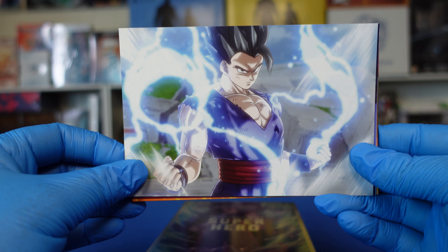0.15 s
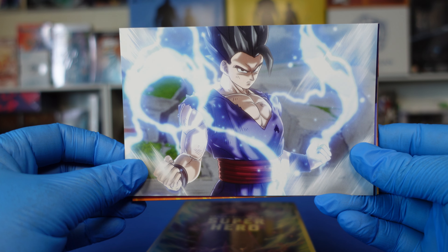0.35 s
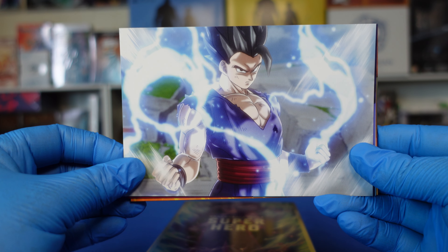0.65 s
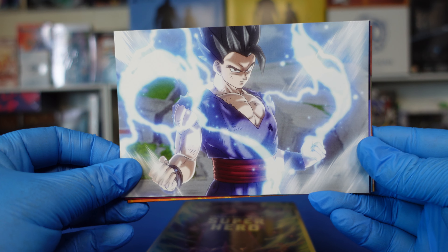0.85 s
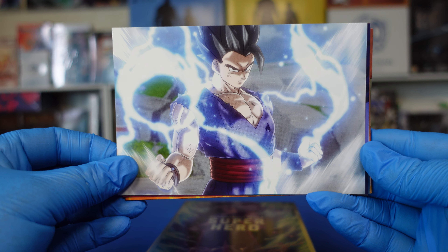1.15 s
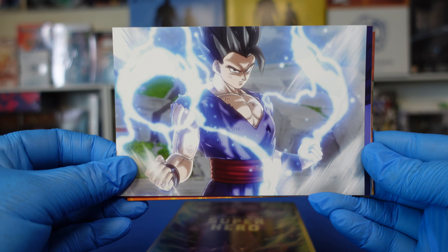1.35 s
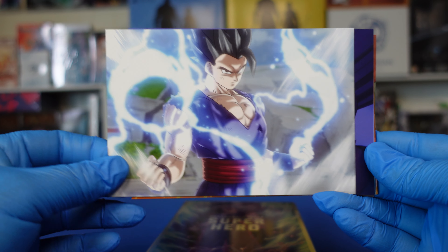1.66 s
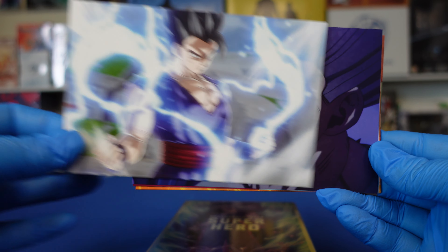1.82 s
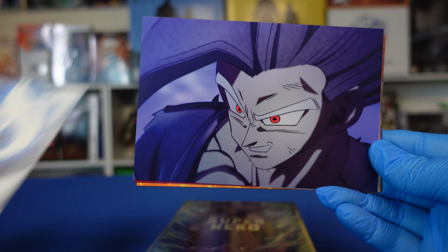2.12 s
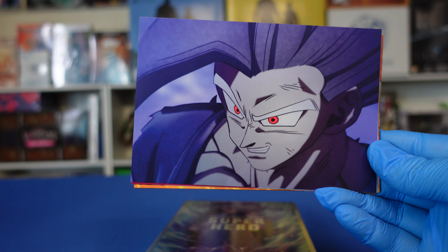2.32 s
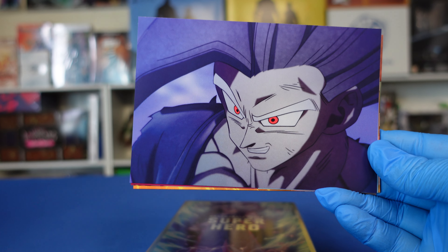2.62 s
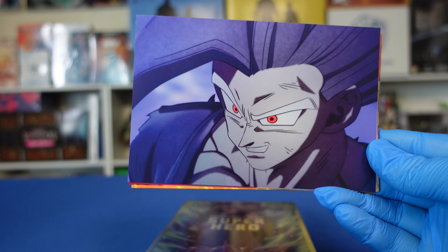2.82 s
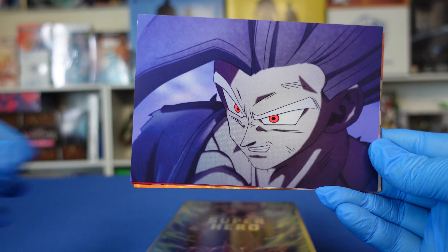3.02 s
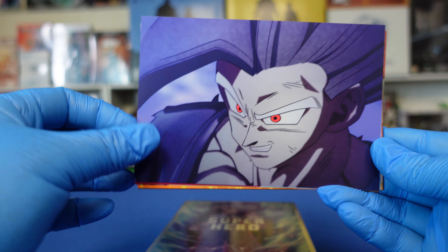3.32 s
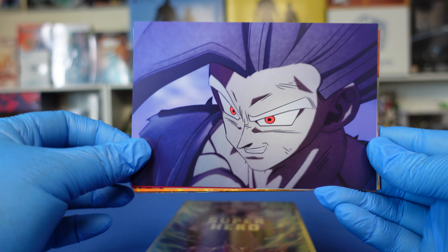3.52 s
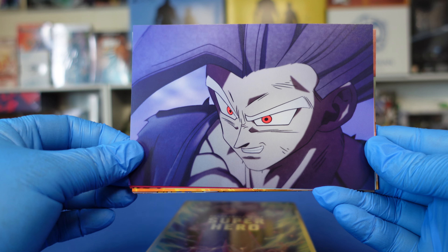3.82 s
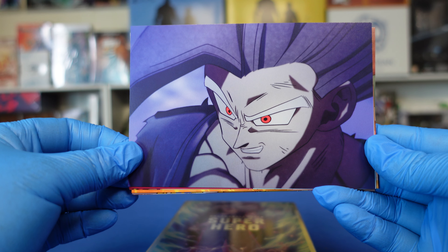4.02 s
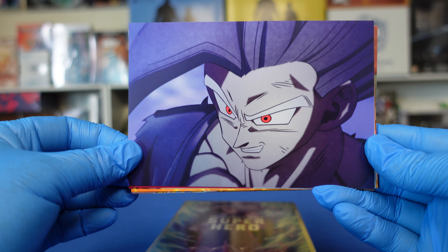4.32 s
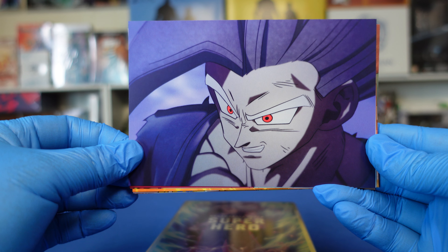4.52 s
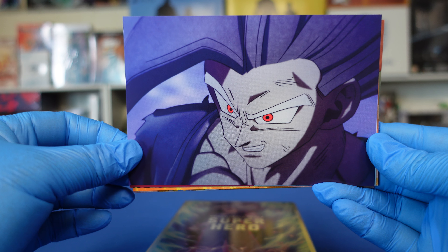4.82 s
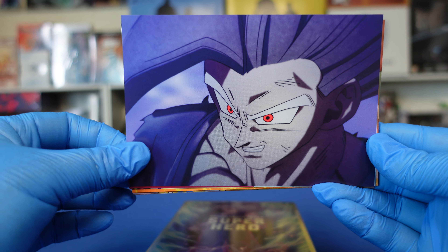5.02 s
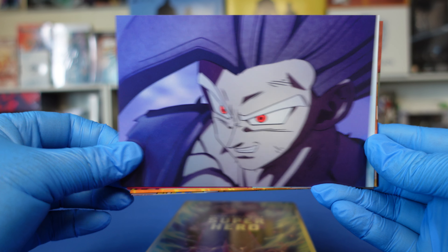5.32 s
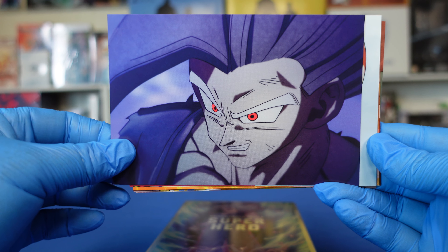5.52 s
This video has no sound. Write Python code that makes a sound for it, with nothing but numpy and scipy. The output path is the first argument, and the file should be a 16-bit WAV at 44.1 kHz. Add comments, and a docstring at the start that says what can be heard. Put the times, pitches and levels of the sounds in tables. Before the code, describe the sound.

Gloved hands slide a stiff card off a stack with a soft hiss and faint squeaks, then snap it in behind.

```python
"""A soft rustle and hiss come first, as gloved hands slide the front card off a stiff stack, close by in
a quiet room. Sliding friction makes the cards hiss, stick-slip motion makes them squeak, and impacts
make their edges tick. The card flexes with dull flaps, is tucked in behind and snaps home against the
stack. After a pause of small finger movements the next card starts to slide."""
import sys
import numpy as np
from scipy import signal
from scipy.fft import rfft, irfft, next_fast_len
from scipy.io import wavfile
from scipy.ndimage import uniform_filter1d

SR = 44100
rng = np.random.default_rng(int(sys.argv[2]) if len(sys.argv) > 2 else 0)


def to_wav(s):
    """Save 16-bit WAV."""
    ch = np.atleast_2d(s).T  # columns
    pcm = np.round(np.clip(ch, -1, 1) * 32767)  # PCM
    wavfile.write(sys.argv[1], SR, pcm.astype(np.int16))


N = 249606
TIME = np.arange(N) / SR

# Spectra of the rubbing cards, one for each grip. Each row: frequency in Hz, relative level in dB.
LOOSENED_SPECTRUM = [(710, -35), (1200, -8.5), (1980, -4), (2530, -2.5), (2830, -1), (4130, -4),
                     (5020, -16), (5650, -3), (6510, -4.5), (10300, -13), (12900, -14), (14700, -8),
                     (16000, -16)]
HELD_SPECTRUM = [(900, -28), (1600, -2), (2800, 12), (3700, 6), (4800, 5), (5900, 9), (7200, 4),
                 (8400, 0.5), (10500, -6), (12300, -4), (13700, 0.5), (16000, -6.5)]
DRAWN_SPECTRUM = [(530, -63), (900, -33), (1120, -22), (1340, -13), (1440, -17), (1830, -2), (2450, -25),
                  (2830, -3), (3470, 4), (4360, -13), (4980, -2.5), (5680, -1.5), (8550, -12), (15100, -10),
                  (16000, -11.5)]
LIFTED_SPECTRUM = [(710, 0), (1200, -12), (1700, -6), (2510, -6), (2650, -2.5), (3080, 0), (4750, -10),
                   (5710, -1.5), (8000, -7.5), (8820, -5), (12200, -9), (15200, -4), (16000, -15)]
FREE_SPECTRUM = [(590, -42), (1000, -16), (1310, -7), (1690, 1), (2130, 1.5), (3750, -8), (5250, 1.5),
                 (6250, -5), (8650, -9.5), (11600, -0.5), (13900, -1), (15500, -2), (16000, -9)]
TUCKED_SPECTRUM = [(350, -38), (600, -10), (997, -6), (1430, -12.5), (1640, 2.5), (1980, -5), (2720, 0.5),
                   (3430, -7.5), (4460, -2), (4980, -7), (5790, 0.5), (8860, -13.5), (9760, -8.5),
                   (14100, -10), (16000, -11)]
SEATED_SPECTRUM = [(470, -58), (800, -26), (1660, -3), (1920, -16), (2700, 2.5), (3650, -8.5), (5940, -2),
                   (7450, -19), (12800, -12), (16000, -24)]
SETTLED_SPECTRUM = [(290, -40), (500, -7), (1600, -6), (2430, -9), (2770, 0), (4800, -6), (7210, -2),
                    (9220, -14), (11000, -12), (14700, -11), (16000, -15)]
NEXT_SPECTRUM = [(470, -52), (800, -20), (942, -19), (1240, -10), (1440, -9), (1920, 3), (2470, -8),
                 (2660, 5), (3140, -5.5), (3650, 0.5), (4460, -7.5), (5580, 1), (6650, -8.5), (12900, -11),
                 (16000, -16)]
# Strokes of the hand. Each row: start and push time in seconds, swell in dB, relative scrape and hiss
# levels at the end of the push in dB, release T60 in seconds, grip.
STROKES = [ (.455, 0.032, 8, -64, -54.5, 1.1, "held"), (0.714, 0.14, 2.5, -44, -51.5, 0.11, "loosened"),
           (.86, .025, 4, -52, -54, 1, "loosened"), (1.0, 0.1, 7, -54.5, -51.5, 0.52, "held"),
           (1.185, .022, 7, -57.5, -50.5, 0.28, "held"), (1.255, 0.17, 4, -54.5, -49, 0.38, "held"),
           (1.435, 0.11, 12.5, -40.5, -39.5, 0.46, "drawn"), (1.545, 0.094, 3, -35, -43, 0.19, "drawn"),
           (1.665, 0.22, 4, -43, -51, .12, "lifted"), (1.87, .025, 0, -51.5, -60, .9, "lifted"),
           (1.96, 0.12, 10, -51, -53, .2, "free"), (2.1, 0.064, 3, -51, -45, 0.51, "free"),
           (2.15, 0.079, 13, -42.5, -42.5, 0.11, "free"), (2.28, 0.082, 21, -46.5, -63, 0.32, "free"),
           (2.432, 0.06, 19.5, -37, -37, .12, "tucked"), (2.499, 0.056, 10.5, -30.5, -32, 0.023, "tucked"),
           (2.556, .012, -2, -38.5, -48, 0.24, "tucked"), (2.59, 0.032, -3, -30.5, -38.5, 0.023, "seated"),
           (2.624, 0.0099, 4.5, -31.5, -31.5, 0.088, "settled"), (2.66, .02, 0, -55.5, -60, 1.2, "settled"),
           (3.395, 0.047, 16, -50.5, -57, .08, "held"), (3.493, .008, 0, -55, -54.5, 0.41, "held"),
           (3.59, .033, -1, -60.5, -60, 0.66, "held"), (3.72, .1, 7, -60.5, -66, 1.4, "held"),
           (4.6, 0.1, 14.5, -52, -48.5, 0.71, "held"), (4.868, .014, 9, -58, -51.5, 0.091, "held"),
           (5.3, .05, 7, -61, -58, .05, "next"), (5.362, 0.025, 2, -46, -48, 0.061, "next"),
           (5.4, .006, 1, -42, -43.5, 0.23, "next"), (5.452, 0.11, 3, -39.5, -46.5, .08, "next"),
           (5.575, .02, -2, -49, -52, 0.39, "next")]
# Damped modes of a card held in the fingers. Each row: frequency in Hz, bandwidth in Hz, gain in dB.
CARD_MODES = [(1710, 200, 3), (2845, 140, 9), (3230, 890, 1.5), (5900, 250, 9), (7960, 1200, -2),
              (9300, 1200, -4), (10600, 8400, -10), (14900, 2200, 1.5)]
# Stick-slip glides. Each row: start, time to the turn and time after it in seconds, slips per second at
# the start, turn and end, relative level in dB, swell in dB, jitter from 0 to 1, direct sound in dB.
SQUEAKS = [ (1.494, 0.069, 0.017, 3500, 3300, 2000, -40, 3, .17, -22),
           (1.576, .036, .042, 2280, 1700, 980, -38, 6, .17, -8),
           (1.597, 0.015, .034, 2800, 4000, 1620, -37, -9, .18, 0),
           (5.401, .011, 0.014, 4600, 1950, 1720, -42, 1, .1, -8),
           (5.483, .025, .011, 1570, 2000, 2700, -42.5, -3, .15, -9),
           (5.519, .013, .038, 2550, 2750, 1100, -39, -6, 0.14, -7)]
# Edge ticks and snaps. Each row: start in seconds, relative level in dB, emphasised frequency in Hz,
# T60 in seconds, left over right in dB.
EDGE_TICKS = [(.848, -35.5, 4400, 0.027, 0), (1.3548, -31.5, 2700, 0.0079, 0),
              (1.457, -35, 3480, 0.0088, 0), (1.659, -24.5, 3160, 0.0065, 0), (1.745, -20, 5970, 0.0062, 0),
              (1.9164, -29, 2660, 0.0083, 2), (1.9227, -32, 2640, .019, 2), (2.084, -38, 6000, 0.012, 2),
              (2.112, -33, 7160, 0.009, 4), (2.244, -32, 5440, .0057, 4), (2.3644, -31, 1900, 0.027, 5),
              (2.4025, -36, 2780, 0.0093, 8), (2.6245, -11, 7260, 0.0063, 3), (2.6244, -21, 2720, 0.01, 16),
              (2.6295, -15.5, 2700, 0.013, 4), (2.6295, -18.5, 10800, 0.0061, 4),
              (2.631, -18, 1380, 0.0058, 5), (3.2558, -30.5, 2420, 0.0042, 1), (3.622, -44, 13500, .02, 0),
              (3.631, -42.5, 2740, 0.021, 0), (3.7797, -35, 2750, .0071, 0),
              (3.7937, -36.5, 3150, 0.007, -2), (3.813, -29.5, 3680, 0.0023, 2),
              (4.967, -39.5, 5700, 0.0061, 0), (5.3528, -26, 3000, .008, 0), (5.356, -25, 8600, 0.0091, 1),
              (5.3615, -18.5, 8300, .011, -.5), (5.3623, -24, 6100, .0092, -1),
              (5.401, -39, 4500, .012, -3), (5.438, -32, 5900, .008, 0), (5.4625, -33.5, 3300, 0.014, 0)]
# Runs of ticks. Each row: start in seconds, count, first gap in seconds, ratio of successive gaps,
# first relative level in dB, change per tick in dB, emphasised frequency in Hz.
STUTTERS = [(1.053, 5, 0.016, 0.84, -43.5, 1.5, 3160), (1.718, 3, 0.0089, 1.25, -33, 3, 3350),
            (1.753, 4, .011, 1.3, -31, 1, 5500), (5.318, 5, .0064, 1, -39.5, 0, 9000),
            (5.575, 7, 0.0057, 1.24, -27, -2, 1800)]
# Bending of card and stack. Each row: start in seconds, relative level in dB, frequency in Hz,
# T60 in seconds.
FLAPS = [(1.917, -34, 758, 0.053), (1.9238, -32, 587, 0.024), (1.929, -35.5, 420, 0.022),
         (1.972, -37.5, 288, 0.029), (2.368, -36, 720, 0.019), (2.553, -49, 192, 0.052),
         (2.629, -39.5, 336, 0.037), (2.632, -38.5, 170, 0.048), (2.635, -49, 121, 0.12)]
# Shifts of the fingers. Each row: middle in seconds, half length in seconds, level in dB.
FINGER_SHIFTS = [(.2, .25, -71), (0.545, 0.045, -63.5), (0.78, .13, -62), (1.08, .07, -63),
                 (1.8, 0.51, -70), (2.406, 0.039, -62), (2.62, 0.13, -64.5), (3.503, .1, -73),
                 (3.777, 0.13, -66.5), (4.2, .4, -79.5)]
# Spectra of gloves, reverberation and room tone. Each row: frequency in Hz, relative level in dB.
GLOVE_SPECTRUM = [(50, -35), (110, -10.5), (170, -6), (240, 6), (330, 3.5), (600, 5), (2000, -44)]
REVERB_SPECTRUM = [(100, 9), (1000, 4), (4000, -7), (9000, -10), (16000, 1)]
AIR_SPECTRUM = [(15, -75), (25, -48), (92, -28), (114, -20), (236, -16), (363, -9), (451, -6), (863, -0.5),
                (1020, -3.5), (1130, -2), (2280, -4), (3430, -10), (5430, -12), (14400, -15), (16000, -18)]
# Likeness of the room tone at the two sides. Each row: frequency in Hz, correlation from 0 to 1.
AIR_CORRELATION = [(60, 0.88), (150, 0.45), (380, 0.47), (950, 0.55), (2380, 0.52), (5980, 0.53),
                   (15000, 0.85)]


def slide(grip, spectrum, scrape_gain_db, hiss_gain_db, low_hz, grains_per_s, pan_db):
    """Sliding friction drives the card's body; the finest catches hiss straight off the surface."""
    force = friction(grains_per_s, smooth=0.91, judder_db=3.5, judder_hz=300)
    rubbing = cut(coloured(edge_reflection(force), spectrum), low_hz, "high")
    scrape = rms_one(cut(rubbing, 9000, "low", order=6))
    hiss = rms_one(cut(rubbing, 9000, "high", order=6))
    scrape_level = hiss_level = np.zeros(N)
    for start, push_s, swell_db, scrape_db, hiss_db, t60, stroke_grip in STROKES:
        if stroke_grip == grip:
            scrape_stroke = stroke(start, push_s, swell_db, scrape_db + scrape_gain_db, t60)
            hiss_stroke = stroke(start, push_s, 0.92 * swell_db, hiss_db + hiss_gain_db, t60)
            scrape_level = np.hypot(scrape_level, scrape_stroke)   # strokes add in power
            hiss_level = np.hypot(hiss_level, hiss_stroke)
    return panned(scrape * scrape_level, pan_db) - panned(hiss * hiss_level, .6 * pan_db)


def friction(grains_per_s, smooth, judder_db, judder_hz, spread_db=2):
    """Surface roughness adds tiny uneven catches to smooth noise; the contact pressure judders."""
    sizes = from_db(spread_db * np.minimum(rng.exponential(1, N), 3)) * rng.choice([-1, 1], N)
    catches = sizes * (rng.random(N) < grains_per_s / SR)
    force = rms_one(catches) + smooth * rng.standard_normal(N)
    steady_drag = evened(force, samples=300)   # the hand keeps the mean drag steady
    return steady_drag * from_db(judder_db * wobble(judder_hz))


def edge_reflection(force, echo_s=0.000793, wander=0.18, share=0.41):
    """Comb filtering: waves return from the card's edge along a path that changes as it moves."""
    delay = echo_s * np.exp(wander * wobble(7.8))
    return force + share * np.interp(TIME - delay, TIME, force)


def stroke(start, push_s, swell_db, db, t60, attack_share=0.21):
    """Friction noise follows the hand's speed: its envelope takes hold, swells and dies away."""
    t = TIME - start
    progress = np.clip(t / push_s, 0, 1)
    attack = np.sin(np.pi / 2 * np.minimum(progress / attack_share, 1)) ** 2
    release = decay(np.clip(t - push_s, 0, 2 * t60), t60)
    return attack * from_db(db + swell_db * (progress - 1)) * release


def card(force):
    """Modal superposition: the card radiates through broad resonances of alternating sign."""
    return sum((-1) ** k * from_db(db) * resonance(force, hz, width_hz)
               for k, (hz, width_hz, db) in enumerate(CARD_MODES))


def squeak(glide, gain_db, attack_s=.0015, release_s=0.0053):
    """Stick-slip motion of the glossy faces makes a pulse train whose rate follows the speed."""
    start, turn_s, after_s, first_hz, turn_hz, last_hz, db, swell_db, jitter, direct_db = glide
    t, length = TIME - start, turn_s + after_s
    rate = np.exp(np.interp(t, [0, turn_s, length], np.log([first_hz, turn_hz, last_hz])))
    progress = np.clip(t / length, 0, 1)
    gate = np.clip(t / attack_s, 0, 1) * np.clip(1 - (t - length) / release_s, 0, 1)
    level = gate * from_db(db + gain_db + swell_db * (progress - .5))
    stray = jitter * np.sqrt(2000 / rate) * (wobble(1500) + .4 * wobble(200))   # slow slips are less even
    cycles = np.cumsum(rate * np.exp(stray)) / SR
    slips = np.diff(cycles % 1, prepend=0)
    sound = rms_one(card(slips)) + from_db(direct_db) * rms_one(cut(slips, 1900, "low"))
    sound = cut(cut(sound, 510, "high"), 6750, "low", order=1)
    flicker = from_db(4.8 * wobble(120))
    return panned(evened(sound, samples=400) * level * flicker, 0)


def ticks(rows, gain_db, focus=1.42, crack_db=-8.5):
    """Impact excitation: an edge lets go or lands, and a burst of contacts rings the card."""
    out, t = np.zeros((2, N)), TIME[:4096]
    for start, db, hz, t60, pan_db in rows:
        envelope = decay(t, t60)
        burst = rng.choice([-1., 1.], len(t)) * envelope
        edge = resonance(burst, hz, width_hz=.22 * hz)
        sound = rms_one(card(burst)) + focus * rms_one(edge) + from_db(crack_db) * rms_one(burst)
        sound = rms_one(cut(sound, 0.36 * hz, "high"))   # small contacts carry no bass
        level = from_db(db + gain_db) * np.sqrt(np.mean(envelope ** 2))
        add(out, start, panned(sound * level, pan_db))
    return out


def stutters(t60=.0058):
    """Repeated impact: an edge skips over the stack, giving tick rows with gaps in geometric series."""
    rows = []
    for start, count, gap_s, ratio, db, step_db, hz in STUTTERS:
        for k in range(count):
            rows.append((start, db + k * step_db, hz, t60, 0))
            start += gap_s * ratio ** k
    return rows


def flaps(gain_db, rise_s=0.0012):
    """Damped oscillation: the whole card bends and swings a few cycles between the fingers."""
    out, t = np.zeros(N), TIME[:8192]
    for start, db, hz, t60 in FLAPS:
        swing = np.sin(2 * np.pi * hz * t) * decay(t, t60)
        onset = 1 - np.exp(-t / rise_s)
        add(out, start, from_db(db + gain_db) * swing * onset)
    return panned(out, .8)


def gloves():
    """Friction of rubber fingers on the stack gives a low rustle that swells and fades."""
    force = friction(grains_per_s=1500, smooth=1, judder_db=1, judder_hz=60)
    power = sum(from_db(db) ** 2 * np.exp(-((TIME - middle) / half_s) ** 2)
                for middle, half_s, db in FINGER_SHIFTS)
    return panned(rms_one(coloured(force, GLOVE_SPECTRUM)) * np.sqrt(power), 0)


def reverberation(sound, t60, tail_db, desk_db, desk_s):
    """Diffuse reflection: early scatter off the desk and a tail from the shelves, unlike at each side."""
    t = TIME[:16384]
    tail = coloured(rng.standard_normal((2, len(t))), REVERB_SPECTRUM) * decay(t, t60) * (t > .006)
    early = rng.standard_normal((2, len(t))) * np.exp(-t / desk_s) * (t > .0008)
    response = (from_db(tail_db) * rms_one(tail) + from_db(desk_db) * rms_one(early)) / np.sqrt(len(t))
    return signal.fftconvolve(sound, response, axes=1)[:, :N]


def room_tone(db, pan_db):
    """Partial coherence: the two sides share some of the steady air noise and microphone hiss."""
    size = next_fast_len(N)
    mid, side = rfft(rng.standard_normal((2, size)))
    correlation = per_bin(AIR_CORRELATION, size)
    left_right = np.sqrt(1 + correlation) * mid + np.sqrt(1 - correlation) * side * [[1], [-1]]
    noise = irfft(left_right, size)[:, :N]
    return panned(from_db(db) * rms_one(coloured(noise, AIR_SPECTRUM)), pan_db)


def from_db(db):
    """Amplitude ratio of a level in decibels."""
    return 10 ** (np.asarray(db) / 20)


def rms_one(x):
    """Normalisation to unit power."""
    return x / np.sqrt(np.mean(x ** 2) + 1e-20)


def evened(x, samples):
    """Normalisation to unit power within a moving window."""
    return x / np.sqrt(uniform_filter1d(x ** 2, size=samples) + 1e-9)


def decay(t, t60):
    """Exponential damping by 60 dB in t60 seconds."""
    return np.exp(-np.log(1000) * t / t60)


def wobble(hz):
    """Bounded random modulation from low-passed noise."""
    return np.tanh(rms_one(cut(rng.standard_normal(N), hz, "low")))


def per_bin(points, size):
    """Interpolation of a table over log frequency at the bins of a transform."""
    hz, value = np.transpose(points)
    return np.interp(np.log(np.fft.rfftfreq(size, 1 / SR) + 1), np.log(hz), value)


def coloured(x, spectrum):
    """Spectral shaping by a smooth gain curve."""
    size = next_fast_len(x.shape[-1])
    return irfft(rfft(x, size) * from_db(per_bin(spectrum, size)), size)[..., :x.shape[-1]]


def cut(x, hz, kind, order=2):
    """Maximally flat high- or low-pass filtering."""
    return signal.sosfilt(signal.butter(order, hz, kind, fs=SR, output="sos"), x)


def resonance(x, hz, width_hz):
    """Two-pole resonance of unit peak gain."""
    radius = np.exp(-np.pi * width_hz / SR)
    feedforward = np.array([1, 0, -1]) * (1 - radius ** 2) / 2
    feedback = [1, -2 * radius * np.cos(2 * np.pi * hz / SR), radius ** 2]
    return signal.lfilter(feedforward, feedback, x + 1e-18)


def panned(x, pan_db):
    """Localisation by level: the left side exceeds the right by pan_db."""
    return x * from_db([[pan_db / 2], [-pan_db / 2]])


def add(out, start, sound):
    """Superposition of a short sound at a start time in seconds."""
    at = round(start * SR)
    out[..., at:at + sound.shape[-1]] += sound[..., :N - at]


def scene():
    """Superposition of the handling sounds, their reflections and the room tone."""
    cards = ticks(EDGE_TICKS + stutters(), gain_db=-1.5) + flaps(gain_db=-1)
    # The two numbers after each spectrum are the scrape and hiss gains in dB.
    cards += slide("loosened", LOOSENED_SPECTRUM, -0.5, -0.5, low_hz=1300, grains_per_s=4000, pan_db=-.3)
    cards += slide("held", HELD_SPECTRUM, -1, -0.5, low_hz=1820, grains_per_s=3000, pan_db=0)
    cards += slide("drawn", DRAWN_SPECTRUM, -0.5, -1, low_hz=2000, grains_per_s=5500, pan_db=-0.5)
    cards += slide("lifted", LIFTED_SPECTRUM, 0.5, 0, low_hz=1200, grains_per_s=990, pan_db=0.5)
    cards += slide("free", FREE_SPECTRUM, 0.5, -1.5, low_hz=910, grains_per_s=2000, pan_db=4)
    cards += slide("tucked", TUCKED_SPECTRUM, 0.5, -0.5, low_hz=497, grains_per_s=4700, pan_db=5)
    cards += slide("seated", SEATED_SPECTRUM, 0.5, -1, low_hz=800, grains_per_s=6000, pan_db=5.5)
    cards += slide("settled", SETTLED_SPECTRUM, 0, 1.5, low_hz=400, grains_per_s=4300, pan_db=2)
    cards += slide("next", NEXT_SPECTRUM, -0.5, 0.5, low_hz=1900, grains_per_s=910, pan_db=0.5)
    cards += sum(squeak(glide, gain_db=-0.5) for glide in SQUEAKS)
    handling = cut(cards, 115, "high", order=4) + gloves()   # the handling sounds carry no deep bass
    reflections = reverberation(handling, t60=0.25, tail_db=-16.5, desk_db=-13, desk_s=0.0011)
    return handling + reflections + room_tone(db=-53.53, pan_db=0.05)


def record(dry):
    """Band limiting: a steep low-pass removes the treble above 15.9 kHz."""
    return signal.sosfilt(signal.ellip(12, .1, 80, 15900, fs=SR, output="sos"), dry)


dry = scene()
out = record(dry)
to_wav(out)
```